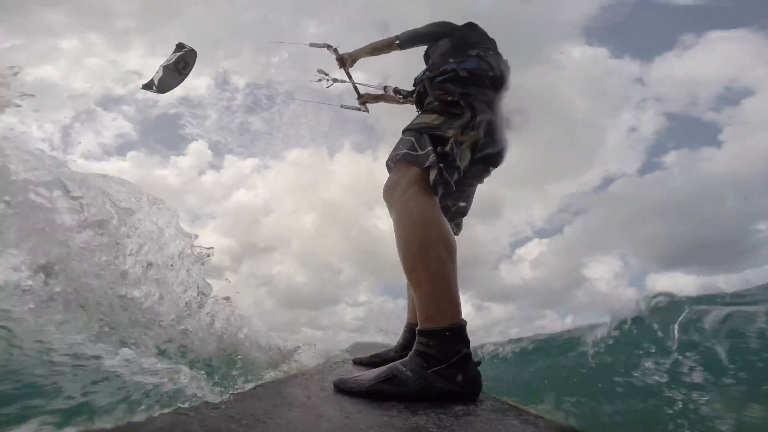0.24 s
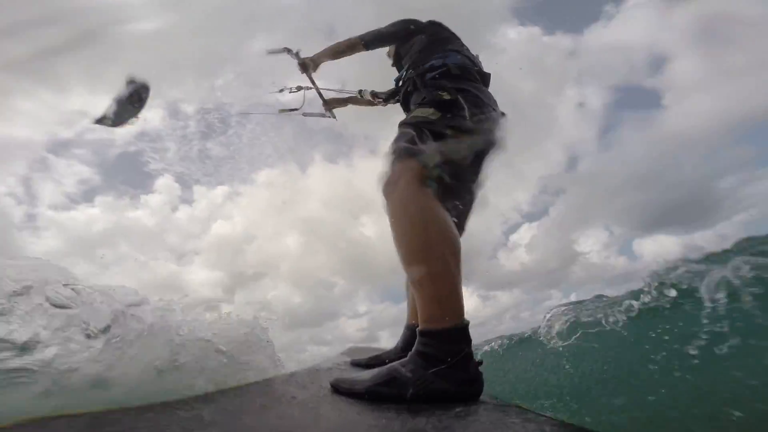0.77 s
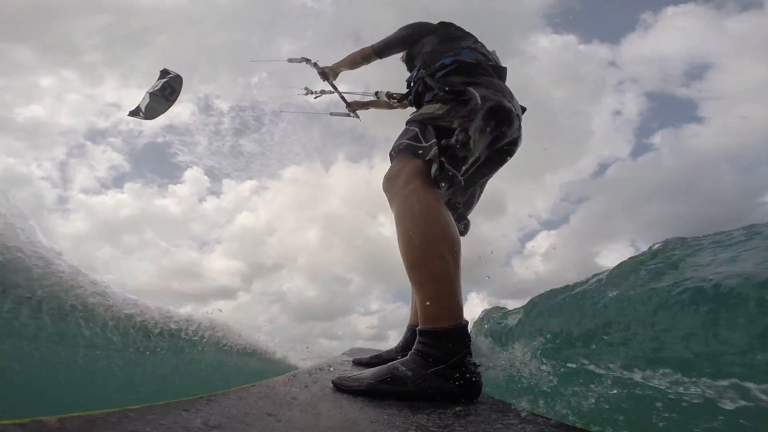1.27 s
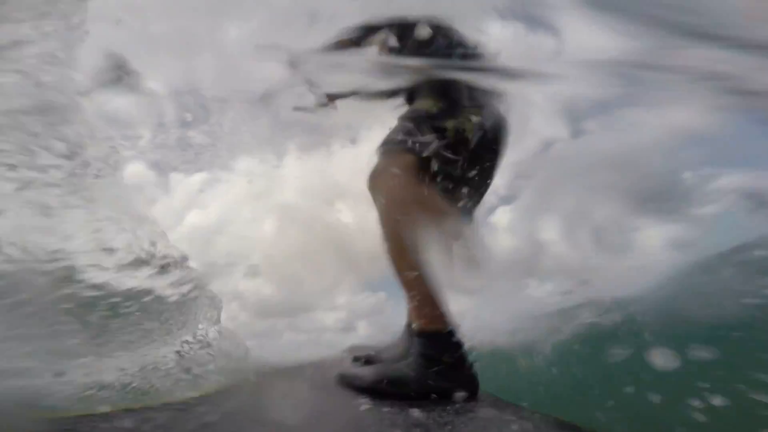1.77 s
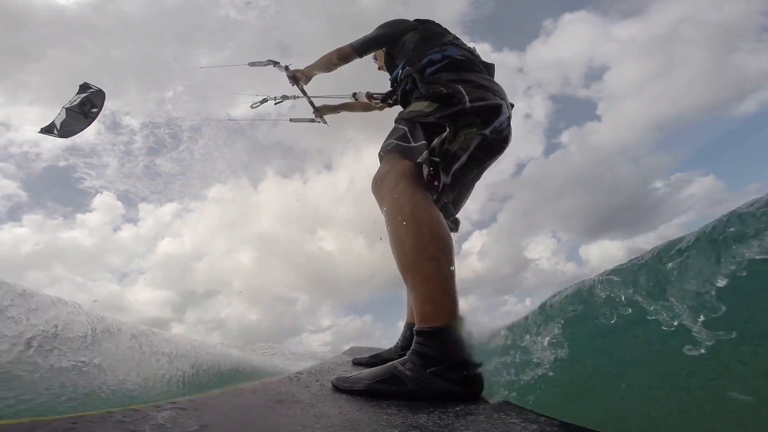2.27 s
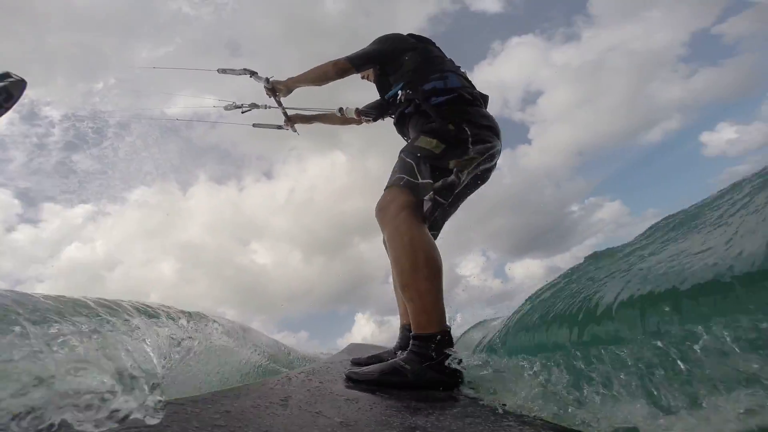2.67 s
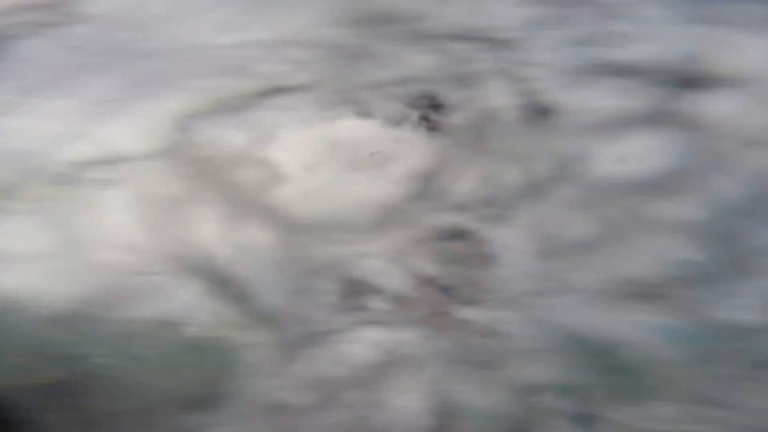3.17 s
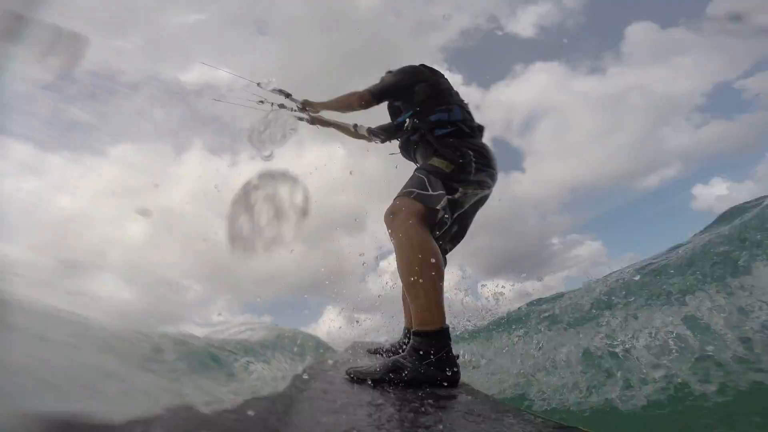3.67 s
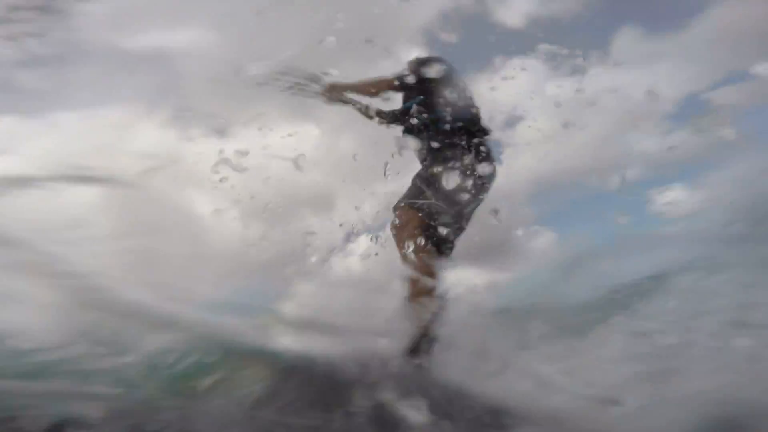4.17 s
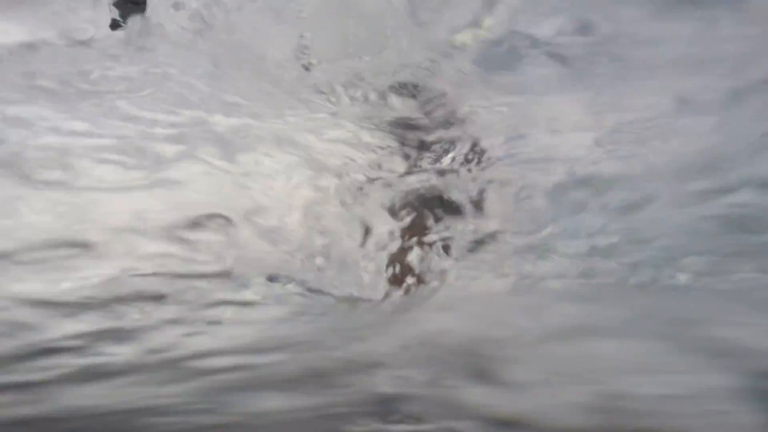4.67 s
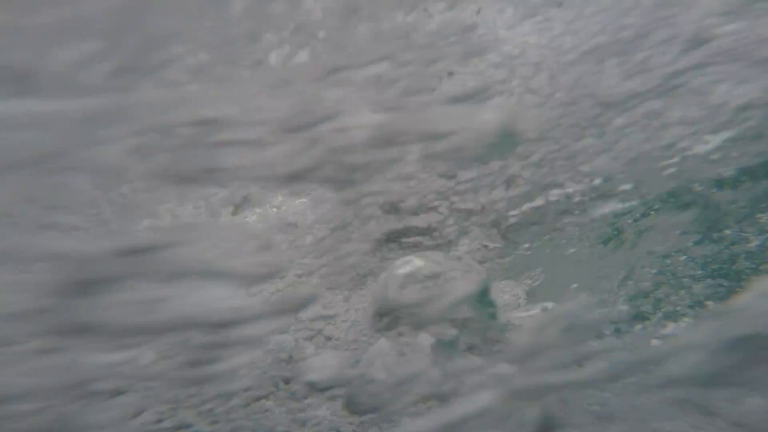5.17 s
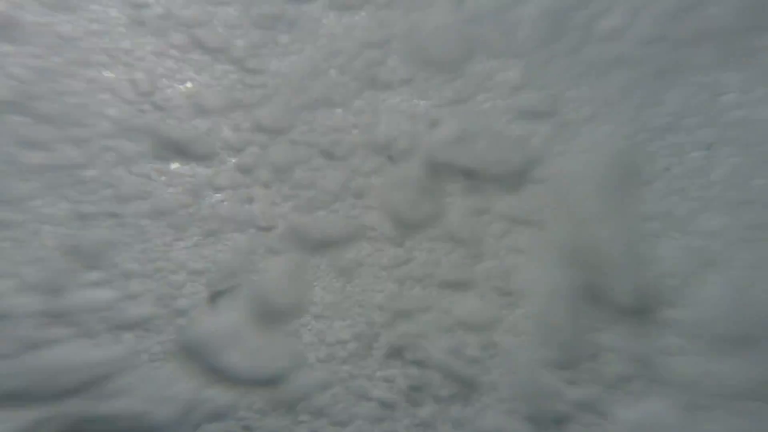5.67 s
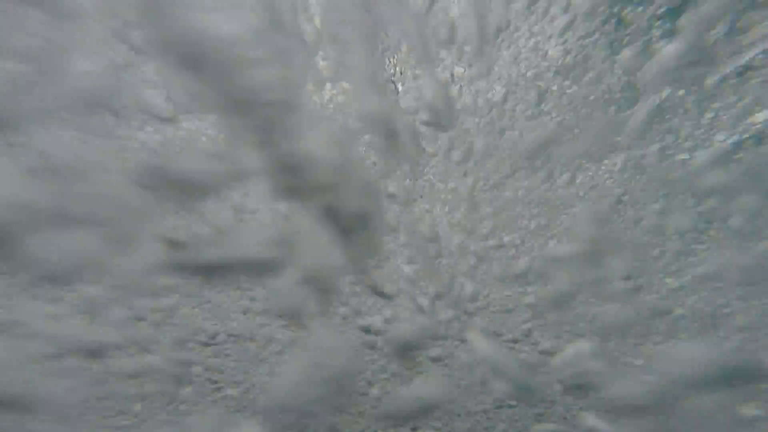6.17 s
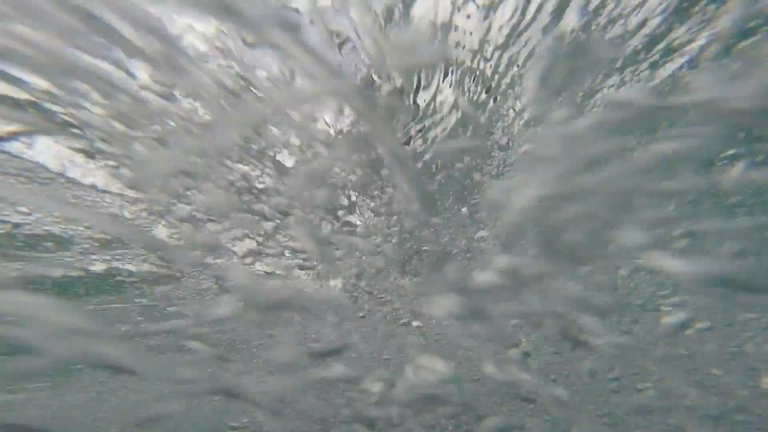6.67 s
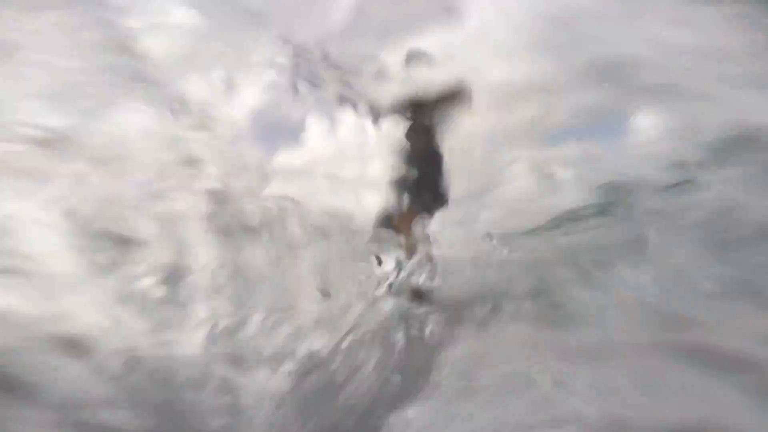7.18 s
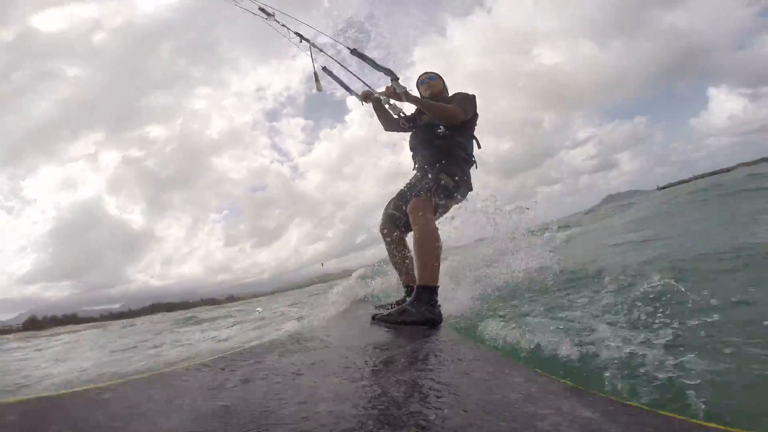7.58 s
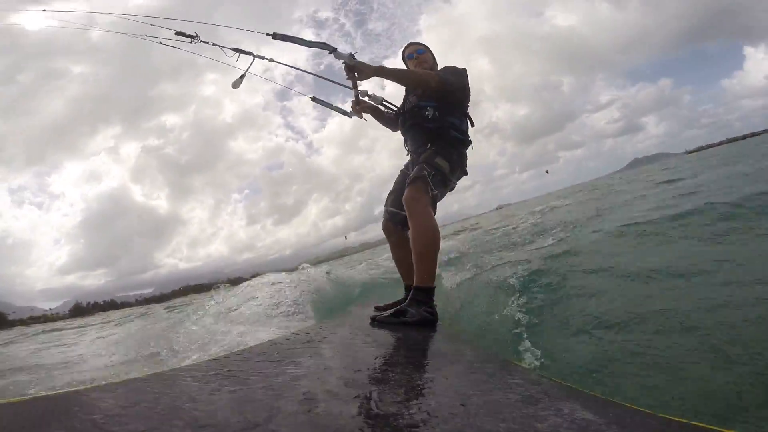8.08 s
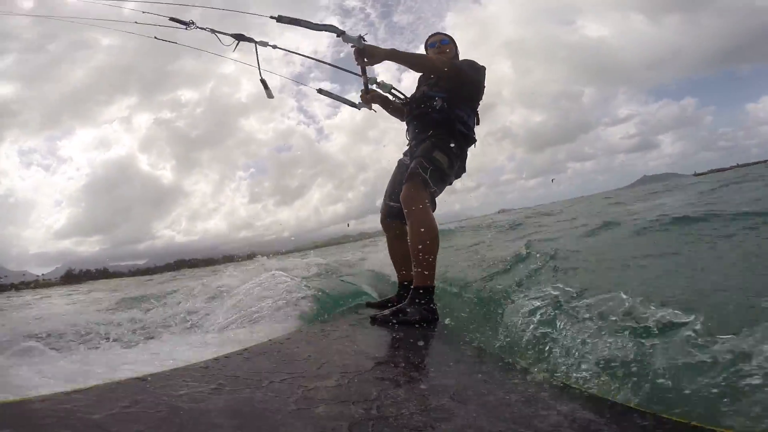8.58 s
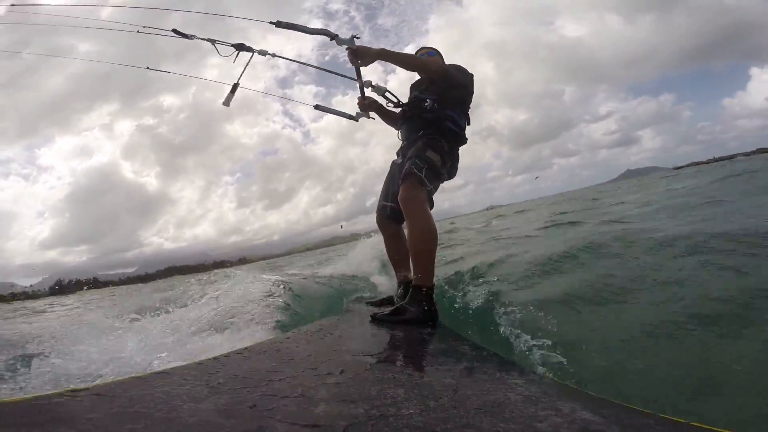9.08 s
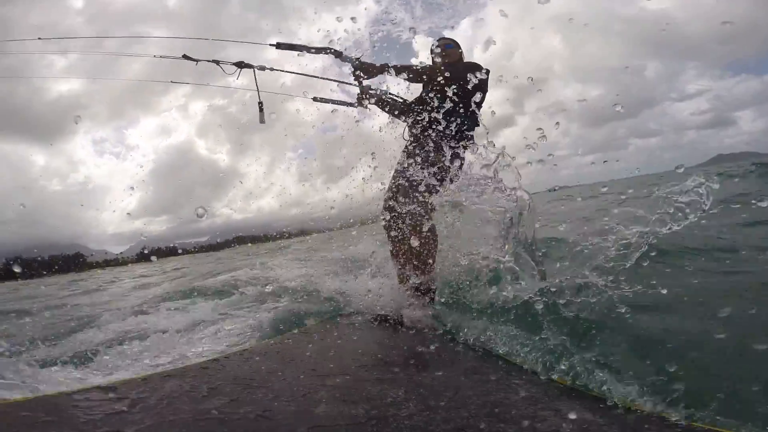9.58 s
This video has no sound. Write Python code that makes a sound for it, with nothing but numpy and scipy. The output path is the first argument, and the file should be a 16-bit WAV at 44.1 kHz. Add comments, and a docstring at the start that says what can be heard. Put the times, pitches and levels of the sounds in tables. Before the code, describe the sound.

Close, muffled thumps of waves under a kiteboard, with hissing spray and a long surge of gurgling foam midway.

```python
"""A low drumming and throbbing: a kiteboard on choppy sea, heard from a sealed camera housing on its nose.
The chop drives the resonances of the deck and the camera mount, and the whole board flexes in its
lowest bending mode. Spray cracks and ticks on the housing. Whenever the nose digs in or dips under,
foam churns over it and single bubbles ring, each at its own pitch."""
import sys
import numpy as np
from scipy import signal
from scipy.io import wavfile
from scipy.ndimage import uniform_filter1d

SR = 44100
rng = np.random.default_rng(int(sys.argv[2]) if len(sys.argv) > 2 else 0)


def wav_out(sig):
    """Save sig, one row per channel (or a flat mono array), as 16-bit PCM at SR to the path in sys.argv[1]."""
    wavfile.write(sys.argv[1], SR, np.round(np.clip(np.atleast_2d(sig).T, -1, 1) * 32767).astype(np.int16))


N = 433503
T = np.arange(N) / SR

# modes of the camera rocking on its mount: pitch_hz, width_hz, level_db
MOUNT_MODES = [(40.9, 54, -7.5), (132.2, 23.7, -5.5), (160, 39, 3), (184.85, 27.5, 1.5)]
# modes of the deck: pitch_hz, width_hz, level_db
DECK_MODES = [(323.5, 210, 4), (383, 147, 6.5), (466, 195, 5), (671, 73, 0.5), (753, 214, -2.5)]
# steady ride between waves: time_s, bending_db, turbulence_db, mount_db, deck_db
STEADY_RIDE = [(0, -36, -27, -24.5, -33.5), (0.65, -49, -67, -28, -38.5), (1.1, -28, -50, -28, -41),
               (2.2, -44, -58, -32.5, -40), (2.62, -38, -37, -26.5, -36.5), (3.0, -27, -42, -44, -72),
               (3.3, -34, -32, -21, -36), (3.75, -35, -47, -33.5, -51), (4.3, -31, -31, -36, -43),
               (5.3, -24.5, -25.5, -30, -45), (5.6, -42, -51, -26.5, -35), (6.06, -32.5, -32.5, -54, -52),
               (6.6, -30.5, -26, -35.5, -72), (7.45, -31.5, -60, -42, -37.5), (7.85, -35, -41, -28.5, -44),
               (8.3, -34, -31, -27, -36), (8.75, -25, -29.5, -41, -45.5), (9.83, -31.5, -28.5, -23.5, -30)]
# waves passing under the hull: crest_s, mount_db, deck_db, rise_s, fall_s
PASSING_WAVES = [(0.168, -3, -17.5, 0.074, 0.035), (0.309, -11.5, -29, 0.15, 0.11),
                 (0.756, -5, -17, 0.043, 0.041), (1.5, -9, -22, 0.18, 0.17),
                 (1.559, -5.5, -29, 0.11, 0.048), (1.89, -19.5, -40.5, 0.11, 0.18),
                 (2.444, -7, -16, 0.044, 0.046), (2.9, -24, -30.5, 0.18, 0.14),
                 (3.1, -2, -29.5, 0.019, 0.017), (3.14, -17.5, -26, 0.036, 0.16),
                 (3.548, -9.5, -40, 0.073, 0.077), (3.96, -19, -29, 0.14, 0.23),
                 (4.26, -16.5, -23, 0.21, 0.15), (4.41, -11.5, -45, 0.056, 0.066),
                 (4.49, -14.5, -47, 0.24, 0.028), (4.589, -16, -35, 0.066, 0.15),
                 (5.03, -20, -23, 0.35, 0.25), (6.6, -22.5, -29, 0.049, 0.06),
                 (7.23, -24, -35.5, 0.27, 0.086), (7.66, -14.5, -22, 0.17, 0.088),
                 (7.97, -8, -28, 0.031, 0.1), (8.412, -7.5, -22.5, 0.026, 0.081),
                 (8.554, -4.5, -16.5, 0.025, 0.048), (9.179, -17, -21, 0.54, 0.38),
                 (9.38, -10, -37.5, 0.25, 0.1), (9.612, -13, -21.5, 0.05, 0.041),
                 (9.82, -17, -48, 0.23, 0.11)]


def hull():
    """Forced vibration: lumpy pressure from the chop, and each slap, ring the mount and the deck."""
    mount_db, deck_db = swells(PASSING_WAVES, columns(STEADY_RIDE, T)[2:])
    turbulence_db = swells(BENDING_KICKS, columns(STEADY_RIDE, T)[:2])[1]
    pressure = rng.standard_normal((3, N))
    pressure *= gain_of([3.03 * wander(25), 2.4 * wander(48), 4.3 * wander(20)])
    mount_slap = slap_envelope(np.zeros(len(CREST_SLAPS)))
    deck_slap = slap_envelope(np.transpose(CREST_SLAPS)[2])
    shake = np.hypot(gain_of(mount_db), mount_slap) * modal_sum(pressure[0], MOUNT_MODES)
    drum = np.hypot(gain_of(deck_db), deck_slap) * modal_sum(pressure[1], DECK_MODES)
    churn = gain_of(turbulence_db) * unit_rms(ring(pressure[2], hz=78.5, width_hz=91))
    jolt = 45 * ring(rising_front(mount_slap), hz=330, width_hz=92)
    knock = 55 * ring(rising_front(deck_slap), hz=480, width_hz=260)
    body = shake + drum + churn + jolt + knock
    return notch(body, hz=255, width_hz=50)  # antiresonance between mount and deck


# crests slapping the hull: start_s, peak_db, deck_relative_db, splash_relative_db, t60_s
CREST_SLAPS = [(0.746, -5, 0, -44, 0.19), (3.076, -3.5, -5, -16, 0.19), (3.866, -19, -12, 12, 0.2),
               (5.214, 5.5, 3.5, -35, 0.028), (7.097, 3, -26, -42, 0.073), (7.942, -1, -1.5, -6.5, 0.17),
               (8.38, -4, 4, -6, 0.24), (8.527, -7, 6.5, -12.5, 0.29)]


def slap_envelope(offsets_db, decay_speed=1.0, rise_s=0.0025, crest_factor_db=8.5):
    """Impact: the rms pressure of each slap rises suddenly and decays exponentially."""
    out, t = np.zeros(N + SR), np.arange(SR // 2) / SR
    for (start_s, peak_db, *_, t60_s), offset_db in zip(CREST_SLAPS, offsets_db):
        level_db = peak_db - crest_factor_db + offset_db - 60 * decay_speed * t / t60_s
        out[round(start_s * SR):][:len(t)] += gain_of(level_db) * np.minimum(t / rise_s, 1)
    return out[:N]


# kicks that bend the whole board: peak_s, bending_db, turbulence_db, rise_s, fall_s
BENDING_KICKS = [(0.34, -10, -28, 0.41, 0.32), (0.81, -14.5, -31, 0.11, 0.39),
                 (1.46, -10.5, -37, 0.13, 0.22), (1.75, -17, -18.5, 0.38, 0.31),
                 (2.07, -19.5, -53, 0.12, 0.3), (2.56, -12, -36, 0.093, 0.53),
                 (2.65, -12, -18.5, 0.11, 0.15), (3.1, -30, -16.5, 0.045, 0.3),
                 (3.2, -10, -39, 0.18, 0.096), (4.18, -15, -18.5, 0.29, 0.12),
                 (5.01, -29, -20.5, 0.62, 0.48), (5.25, -40, -19, 0.32, 1), (6.71, -7.5, -29, 0.18, 0.28),
                 (6.93, -13.5, -24.5, 0.57, 0.092), (7.07, -37, -24.5, 0.2, 0.63),
                 (7.23, -12.5, -26.5, 0.16, 0.13), (7.66, -15.5, -40, 0.086, 0.25),
                 (7.97, -16.5, -28.5, 0.065, 0.39), (8.42, -14.5, -33, 0.23, 0.28),
                 (9.17, -6, -39, 0.054, 0.14)]


def flex(pitch_hz=24.55):
    """Beam bending: the lowest mode is nearly a pure tone, unsteady where the water kicks it."""
    level_db = swells(BENDING_KICKS, columns(STEADY_RIDE, T)[:2])[0]
    turns = np.cumsum(pitch_hz * (1 + 0.0546 * wander(3.46))) / SR
    kicked = unit_rms(ring(rng.standard_normal(N), hz=30, width_hz=21))
    return gain_of(level_db) * unit_rms(np.sin(2 * np.pi * turns) + 0.14 * kicked)


# water running on the housing between surges: time_s, level_db, treble_db
RUNNING_WATER = [(0, -46.5, -57.5), (1.26, -51.5, -66.5), (1.65, -48.5, -59), (1.9, -47, -66),
                 (2.4, -45.5, -62.5), (2.71, -47.5, -69), (3.08, -30.5, -61), (3.3, -36.5, -52),
                 (3.69, -42, -60.5), (3.83, -37, -72), (3.92, -25.5, -38.5), (4.18, -31, -40),
                 (4.3, -27, -51.5), (4.37, -27, -37), (5.15, -32.5, -47), (5.25, -38, -53.5),
                 (5.46, -45, -66), (6.03, -21, -91), (6.2, -31, -45), (6.72, -23.5, -45.5),
                 (7.12, -48.5, -45), (7.3, -34.5, -57), (7.5, -41.5, -73), (7.9, -36.5, -63.5),
                 (8.15, -38, -67.5), (8.36, -33.5, -61), (8.6, -34, -60), (8.74, -41, -69.5),
                 (9.2, -32, -58.5), (9.66, -32, -59.5), (9.83, -35, -69)]
# surges over the housing: peak_s, level_db, treble_db, rise_s, fall_s
WATER_SURGES = [(0.62, -33.5, -46, 0.16, 0.34), (1.31, -37, -51.5, 0.055, 0.49),
                (2.62, -32, -52.5, 0.21, 0.053), (3.39, -20, -31, 0.06, 0.26),
                (3.5, -25, -35.5, 0.55, 0.13), (3.57, -20.5, -45, 0.23, 0.15),
                (3.89, -17, -69, 0.04, 0.029), (3.99, -15.5, -31.5, 0.08, 0.14),
                (4.14, -23.5, -35.5, 0.4, 0.045), (4.48, -21, -33, 0.17, 0.28),
                (4.68, -24.5, -35, 0.22, 0.13), (4.82, -17, -30.5, 0.091, 0.14),
                (4.94, -15, -37, 0.12, 0.16), (5.1, -13.5, -33, 0.3, 0.16), (5.4, -20, -47, 0.59, 0.13),
                (5.65, -22.5, -83, 0.69, 0.24), (6.08, -20.5, -38.5, 0.062, 0.021),
                (6.19, -16.5, -44, 0.11, 0.48), (6.68, -15.5, -34, 0.64, 0.035),
                (6.78, -18.5, -40, 0.039, 0.39), (6.97, -14, -31, 0.076, 0.19),
                (7.24, -18, -41.5, 0.054, 0.032), (7.615, -19, -60.5, 0.085, 0.11),
                (7.94, -19, -61, 0.018, 0.096), (8.81, -32, -82, 0.055, 0.1), (9.0, -27.5, -72, 0.17, 0.26),
                (9.165, -16.5, -62, 0.067, 0.025), (9.37, -18.5, -54.5, 0.052, 0.042)]
# immersion of the housing: time_s, foam_fraction, depth_fraction
IMMERSION = [(0, 0.35, 0.05), (2.9, 0.2, 0), (3.3, 0.11, 0.29), (3.66, 0.52, 0.5), (3.72, 0.04, 0.47),
             (3.84, 0, 0.4), (3.88, 0.35, 0.3), (5.15, 0.39, 0.25), (5.3, 0.21, 0.68), (6.1, 0.08, 0.93),
             (6.2, 0.33, 0.38), (7.22, 0.5, 0.04), (7.35, 0.26, 0.12), (9.83, 0.04, 0)]


def wash(splash_relative_db=-13, usual_treble_db=-24):
    """Incoherent sources add in power: running water, surges and the splash of each wave and slap."""
    flow_db, treble_db = swells(WATER_SURGES, columns(RUNNING_WATER, T))
    wave_splashes = [(crest_s, deck_db + splash_relative_db, rise_s, fall_s)
                     for crest_s, _, deck_db, rise_s, fall_s in PASSING_WAVES]
    level_db = swells(wave_splashes, [flow_db])[0]
    wet, depth = np.clip(columns(IMMERSION, T), 0, 1)
    heard = through_housing(water_noise(wet, depth), wet, treble_db - level_db - usual_treble_db)
    slap_splash = slap_envelope(np.transpose(CREST_SLAPS)[3], decay_speed=0.72)
    return np.hypot(gain_of(level_db), slap_splash) * unit_rms(heard)


def water_noise(wet, depth):
    """Event density sets texture: hiss in the air, dense foam when wet, sparser bubbles when under."""
    flicker_db = (2.5 + 2.3 * wet + 0.9 * depth) * wander(210) + (1.44 + 3 * wet) * wander(32)
    hiss = unit_rms(rng.standard_normal(N) * gain_of(flicker_db)) * (0.8 - 0.032 * wet - 0.73 * depth)
    froth = (0.17 + wet) * foam(per_s=2300 - 1700 * depth)
    patter = (0.05 + 0.54 * wet) * (1 - 0.82 * depth) * spray()
    return hiss + froth + patter


def foam(per_s, size_exponent=0.48, bands=22):
    """Bubbles burst in clumps with power-law strengths; a few are large, and sparser ones are louder."""
    out, clumps = np.zeros(N), gain_of(2.4 * wander(60))
    for hz in np.geomspace(450, 14000, bands):
        draw = rng.random(N) / (per_s / bands * clumps / SR)
        bursts = (draw < 1) * np.maximum(draw, 0.02) ** -size_exponent / np.sqrt(per_s)
        grain = bubble(hz, cycles=6 * (hz / 2000) ** 0.67, glide=rng.uniform(0, 0.16))
        out += signal.oaconvolve(bursts, grain / np.linalg.norm(grain))[:N] * np.sqrt(hz)
    return unit_rms(out)


def spray(per_s=60, decay_s=0.00045):
    """Shot noise: fine spray lands at random as sparse broadband clicks."""
    hits = (rng.random(N) < per_s / SR) * gain_of(9 * np.minimum(rng.exponential(1, N), 2.5))
    envelope = signal.lfilter([1], [1, -np.exp(-1 / (decay_s * SR))], hits)
    return unit_rms(envelope * rng.standard_normal(N))


# spectrum of wake and spray in the air, with the housing's cavity rings: frequency_hz, density_db
AIR_SPECTRUM = [(400, 5.5), (800, 5.5), (1250, 7), (1600, 3), (2400, 0), (2800, -8), (3250, -8.5),
                (3900, -14), (5300, -22.5), (6200, -23), (6950, -29), (7550, -25.5), (8400, -36),
                (12000, -36), (16000, -58.5)]
# spectrum of water heard through the wall: frequency_hz, density_db
WALL_SPECTRUM = [(240, -12.5), (400, -14), (466, -19.5), (2230, 6), (3750, -1.5), (4440, -8.5),
                 (6220, -15.5), (8580, -39.5), (11000, -40), (13000, -52.5), (15600, -47.5)]
# hollow ring of the enclosed air, fading once the housing is soaked: time_s, gain_db
CAVITY_RING = [(2.5, 3), (3.3, -1), (7.3, -1)]
# narrow dips in transmission through the wall: frequency_hz, width_hz
WALL_DIPS = [(1290, 51), (5450, 140)]


def through_housing(water, wet, treble_change_db, cavity_hz=2250, cavity_width_hz=420):
    """Transmission colours sound: wetting shifts the spectrum from airborne to heard through the wall."""
    hz, t, spectrum = signal.stft(water, SR, nperseg=256, noverlap=192)
    hz, wet = hz[:, None], np.interp(t, T, wet)
    air_db, wall_db = (np.interp(np.log(hz + 1), np.log(knots_hz), db)
                       for knots_hz, db in (np.transpose(AIR_SPECTRUM), np.transpose(WALL_SPECTRUM)))
    treble_share = np.clip(np.log((hz + 1) / 2600) / np.log(6500 / 2600), 0, 1.25)
    colour_db = air_db * (1 - wet) + wall_db * wet + treble_share * np.interp(t, T, treble_change_db)
    # foam gurgles in patches of time and pitch
    patches = uniform_filter1d(rng.standard_normal(spectrum.T.shape), size=10, axis=0)
    patches = uniform_filter1d(patches, size=4, axis=1).T
    gurgle_db = (1.17 + 2 * wet) * unit_rms(patches)
    cavity_db = np.exp(-((hz - cavity_hz) / cavity_width_hz) ** 2) * columns(CAVITY_RING, t)[0]
    spectrum *= gain_of(colour_db + gurgle_db + cavity_db)
    heard = signal.istft(spectrum, SR, nperseg=256, noverlap=192)[1][:N]
    for dip_hz, width_hz in WALL_DIPS:
        heard = notch(heard, dip_hz, width_hz)
    return heard


# lumps of spray cracking on the housing: start_s, level_db, treble_relative_db, decay_s
SPRAY_LUMPS = [(0.493, -9, -32, 0.0048), (0.531, -15.5, -34, 0.0021), (1.178, -18.5, -10, 0.0015),
               (1.689, -5.5, -25, 0.0091), (1.699, -2.5, -29, 0.0023), (1.712, 8.5, -25, 0.0012),
               (1.719, -17.5, -29, 0.014), (1.759, -17.5, -25, 0.0082), (1.786, -15, -37, 0.0022),
               (1.856, -4.5, -55, 0.0027), (1.863, -13, -40, 0.0048), (2.214, -19, -30, 0.0014),
               (2.637, -5, -18, 0.0039), (2.684, -22, -50, 0.0026), (4.456, -7, -33, 0.0032),
               (6.011, -21, -62, 0.0047), (6.291, 0, -34, 0.004), (7.219, 0, -21, 0.0025),
               (7.411, -13.5, -30, 0.0021), (7.71, -5, -44, 0.0013), (8.384, -31, -60, 0.0018),
               (9.168, -20, -30, 0.0037), (9.401, -8, -26, 0.0025)]


def splats(push_hz=260):
    """A short impact has a wide spectrum: each lump gives a burst of noise and a push on the wall."""
    out, t = np.zeros(N + 1500), np.arange(1400) / SR
    push = -0.25 * np.sin(2 * np.pi * push_hz * t) * np.exp(-t / 0.0015)
    for start_s, level_db, treble_db, decay_s in SPRAY_LUMPS:
        noise = rng.standard_normal(len(t))
        crack = unit_rms(ring(noise, hz=740, width_hz=2310)) * np.minimum(t / 0.00032, 1)
        treble = gain_of(treble_db) * unit_rms(ring(noise, hz=5400, width_hz=17300))
        burst = 0.5 * (crack + treble) * np.exp(-(t / decay_s) ** 1.1)
        out[round(start_s * SR):][:len(t)] += gain_of(level_db) * (burst + push)
    return out[:N]


# large bubbles against the housing: start_s, level_db, pitch_hz
LARGE_BUBBLES = [(0.74, -17.5, 1770), (0.75, -16.5, 820), (1.297, -27.5, 940), (1.428, -25, 2000),
                 (1.7, -10.5, 2310), (2.609, -26, 1650), (3.063, -23, 1880), (3.351, -21, 1650),
                 (3.366, -15, 2070), (3.496, -9, 1380), (3.569, -15, 1155), (3.962, -14, 1410),
                 (4.027, -9.5, 930), (4.26, -16.5, 1630), (4.475, -9.5, 2180), (4.543, -19, 1720),
                 (4.742, -16, 2240), (4.862, -20, 1990), (5.144, -8.5, 1090), (5.192, -12, 1080),
                 (5.344, -15, 1390), (5.538, -13, 1615), (6.058, -14, 2240), (6.158, -12.5, 1290),
                 (6.175, -5.5, 943), (6.234, -14, 1430), (6.336, -15, 2070), (6.447, -20, 2090),
                 (6.613, -13, 1580), (6.911, -12, 1410), (6.952, -9.5, 2100), (6.981, -10.5, 1060),
                 (7.16, -17.5, 860), (7.253, -14, 1440), (7.606, -13.5, 780), (7.754, -22.5, 1900),
                 (7.941, -18, 1070), (8.139, -31, 2560), (8.182, -16, 1710), (8.199, -12.5, 880),
                 (8.213, -18, 1030), (8.51, -22.5, 1690), (8.541, -15, 1710), (8.636, -22, 880),
                 (8.817, -21.5, 1090), (8.994, -20, 990), (9.04, -19, 545), (9.108, -12.5, 477)]


def large_bubbles():
    """Bubble resonance: each pocket of air rings briefly at its pitch, inside a little noise."""
    out, t = np.zeros(N + 900), np.arange(700) / SR
    chances = rng.random((len(LARGE_BUBBLES), 2))
    for (start_s, level_db, hz), (stretch, bend) in zip(LARGE_BUBBLES, chances):
        tone = bubble(hz, cycles=0.004 * (1 + stretch) * hz, glide=0.12 * bend)
        envelope = np.exp(-t / 0.006) * np.minimum(t / 0.001, 1)
        fuzz = 0.33 * unit_rms(ring(rng.standard_normal(len(t)), hz, width_hz=900)) * envelope
        out[round(start_s * SR):][:len(t)] += gain_of(level_db) * (1.47 * tone / abs(tone).max() + fuzz)
    return out[:N]


# fine droplets and pin bubbles on the lens port: start_s, level_db, pitch_hz
PORT_TICKS = [(0.721, -22.5, 6160), (0.8405, -26, 3180), (0.873, -30, 3000), (0.887, -31, 6050),
              (1.3837, -16.5, 2170), (1.4122, -22, 6100), (2.668, -34, 4600), (2.714, -29, 1500),
              (5.189, -5.5, 5080), (5.2505, -24, 5670), (5.453, -34, 6100), (6.2668, -13, 6200),
              (8.4727, -36, 4150), (8.5814, -46, 4650), (9.5594, -25, 3970), (9.6051, -33, 4940)]


def ticks():
    """Heavy damping: each tick is a few cycles at its pitch and a broadband click."""
    out, t = np.zeros(N + 900), np.arange(700) / SR
    for start_s, level_db, hz in PORT_TICKS:
        tone = bubble(hz, cycles=0.002 * hz, glide=0.02)
        noise = rng.standard_normal(len(t))
        click = 0.73 * unit_rms(ring(noise, 0.6 * hz, width_hz=3320)) * np.exp(-t / 0.00065)
        out[round(start_s * SR):][:len(t)] += gain_of(level_db) * (0.75 * tone / abs(tone).max() + click)
    return out[:N]


def pin_bubbles(per_s=120, level_db=-58, bands=9):
    """Small bubbles resonate high: lone ones ping on the port, more often the deeper it is."""
    out, depth = np.zeros(N), np.maximum(columns(IMMERSION, T)[1] - 0.1, 0)
    for hz in np.geomspace(2800, 9000, bands):
        onsets = rng.random(N) < per_s / bands * depth / SR
        strengths = gain_of(4 * np.minimum(rng.exponential(1, N), 3))
        ping = bubble(hz, cycles=0.0022 * hz, glide=0.05)
        out += signal.oaconvolve(onsets * strengths, ping)[:N] * (3000 / hz) ** 2.16
    return gain_of(level_db) * unit_rms(out)


def bubble(hz, cycles, glide):
    """Damped oscillator with a soft start and a pitch that rises as it dies."""
    age = np.arange(700) / SR * hz / cycles
    envelope = age / (age + 0.25) * np.exp(-3 * age)
    return envelope * np.sin(2 * np.pi * cycles * age * (1 + glide * age))


def ring(x, hz, width_hz):
    """Steep resonance: one peak filter applied twice."""
    b, a = signal.iirpeak(hz, hz / width_hz, SR)
    return signal.lfilter(b, a, signal.lfilter(b, a, x))


def notch(x, hz, width_hz):
    """Antiresonance: one narrow band cancels."""
    return signal.lfilter(*signal.iirnotch(hz, hz / width_hz, SR), x)


def modal_sum(force, modes):
    """Modal superposition: one force drives every mode."""
    return unit_rms(sum(gain_of(db) * unit_rms(ring(force, hz, width_hz)) for hz, width_hz, db in modes))


def rising_front(envelope):
    """Impulse: the rising edge of a slap gives one kick."""
    return np.maximum(np.diff(envelope, prepend=0), 0)


def swells(events, steady_db):
    """Power summation, in dB: events swell over steady levels, changing 20 dB per rise_s or fall_s."""
    t, power = T[::32], 0
    for peak_s, *peak_db, rise_s, fall_s in events:
        drop_db = 20 * np.maximum((peak_s - t) / rise_s, (t - peak_s) / fall_s)
        power = power + gain_of(2 * (np.array(peak_db)[:, None] - drop_db))
    return [10 * np.log10(np.interp(T, t, p) + gain_of(2 * db)) for p, db in zip(power, steady_db)]


def wander(hz):
    """Low-pass noise of rms 1: changes faster than hz are smoothed away."""
    size = int(SR / hz)
    return unit_rms(uniform_filter1d(uniform_filter1d(rng.standard_normal(N), size), size))


def columns(rows, t):
    """Linear interpolation of every column at times t."""
    time_s, *curves = np.transpose(rows)
    return [np.interp(t, time_s, curve) for curve in curves]


def gain_of(db):
    """Decibels to amplitude ratio."""
    return 10 ** (np.asarray(db) / 20)


def unit_rms(x):
    """Normalisation to rms 1."""
    return x / np.sqrt(np.mean(x ** 2) + 1e-20)


def scene():
    """Superposition at one microphone inside the housing."""
    return (flex() + hull() + wash() + splats() + large_bubbles() + ticks() + pin_bubbles())[None]


def record(dry):
    """Soft saturation rounds the hardest blows; a low-pass filter limits the band."""
    saturated = dry / (1 + dry ** 4) ** 0.25
    low_pass = signal.firwin(511, cutoff=15760, window=("kaiser", 9), fs=SR)
    return signal.oaconvolve(saturated, low_pass[None], "same")


dry = scene()
out = record(dry)
wav_out(out)
```